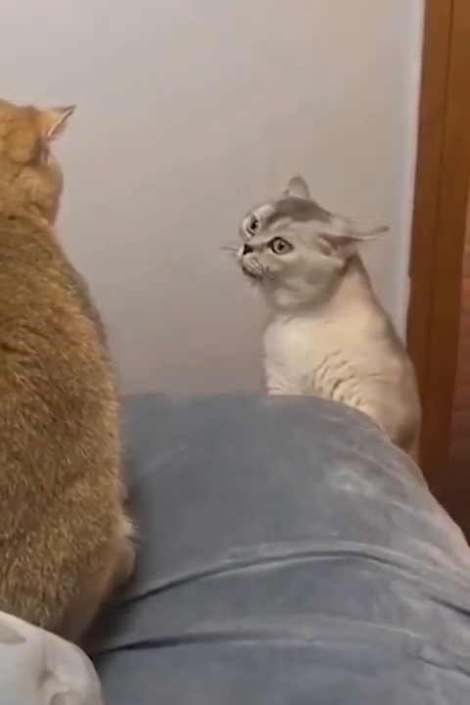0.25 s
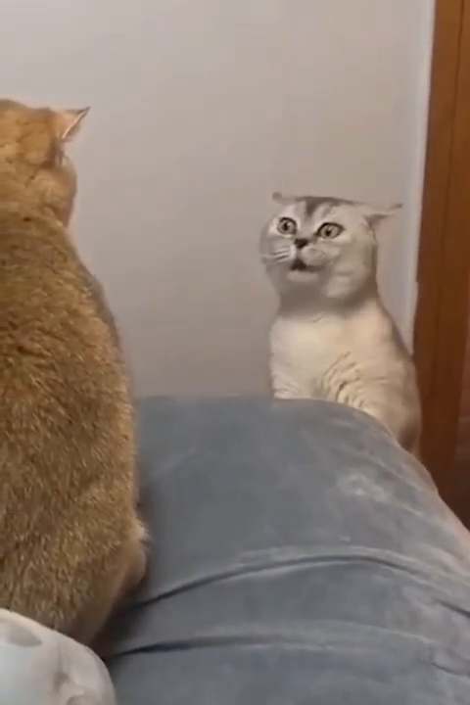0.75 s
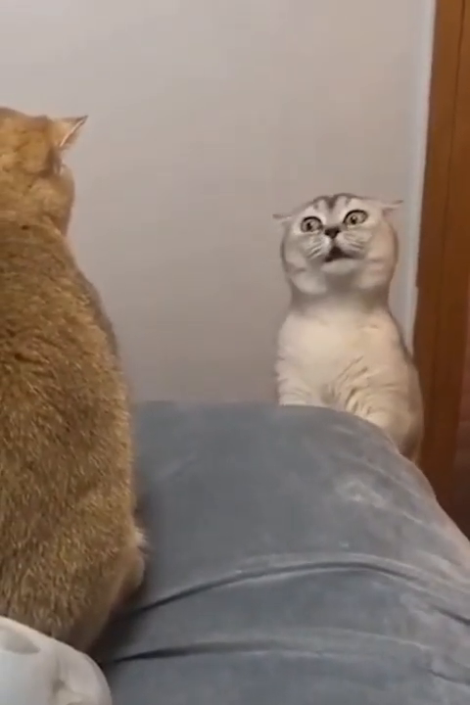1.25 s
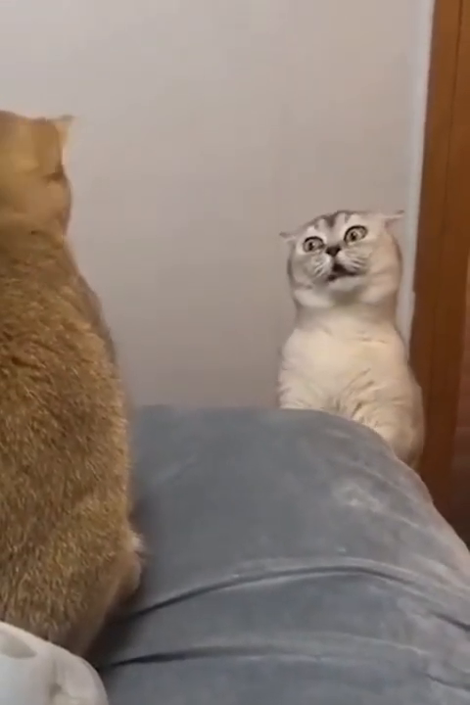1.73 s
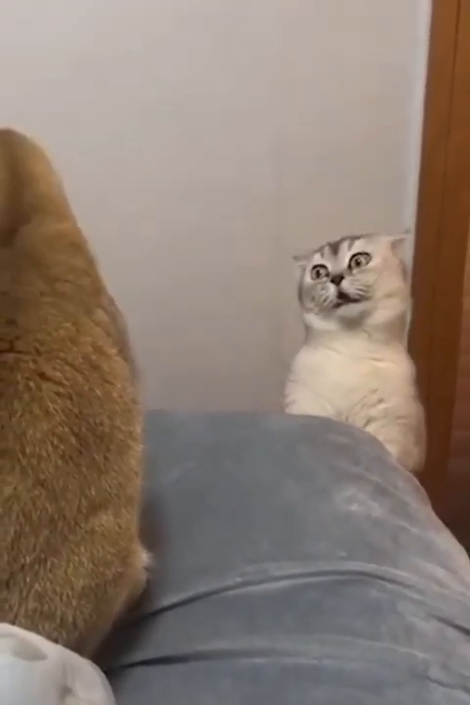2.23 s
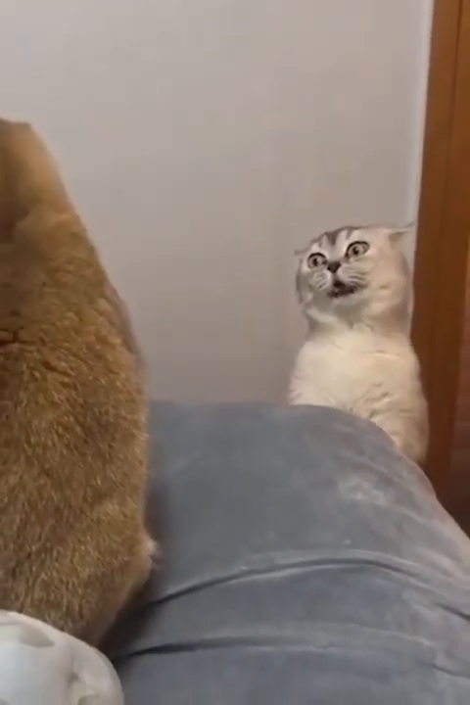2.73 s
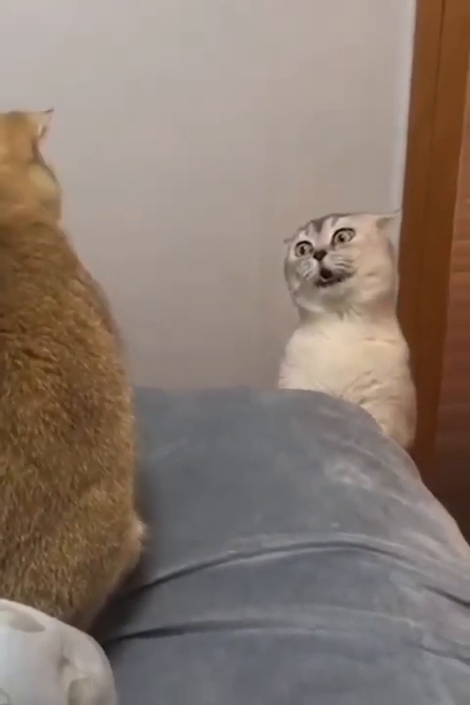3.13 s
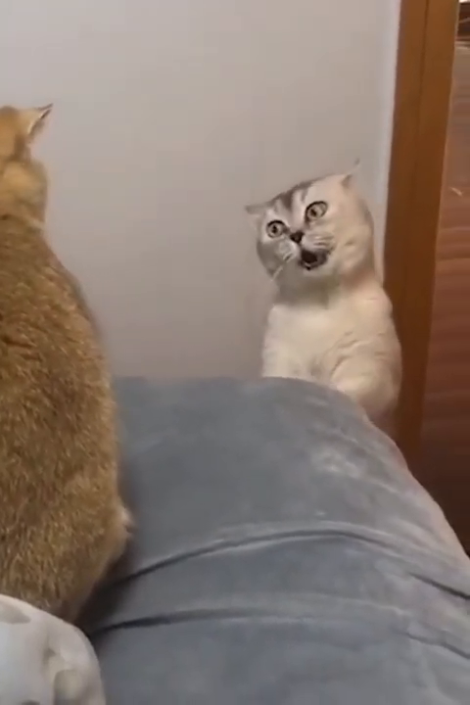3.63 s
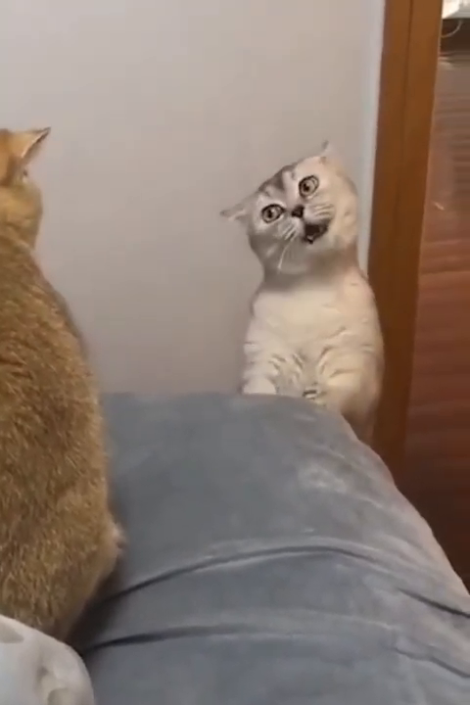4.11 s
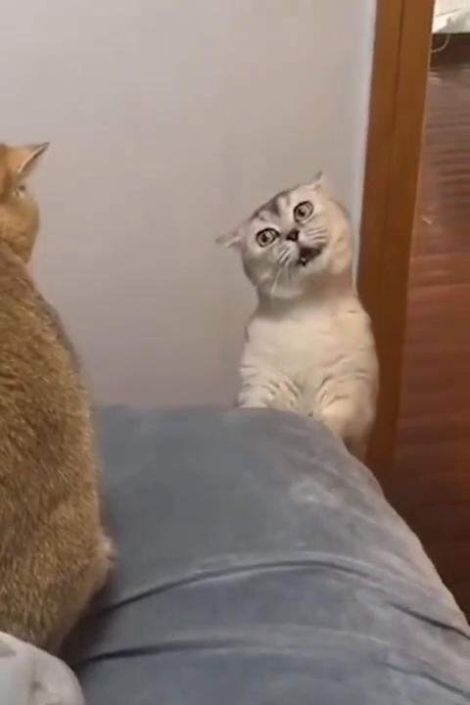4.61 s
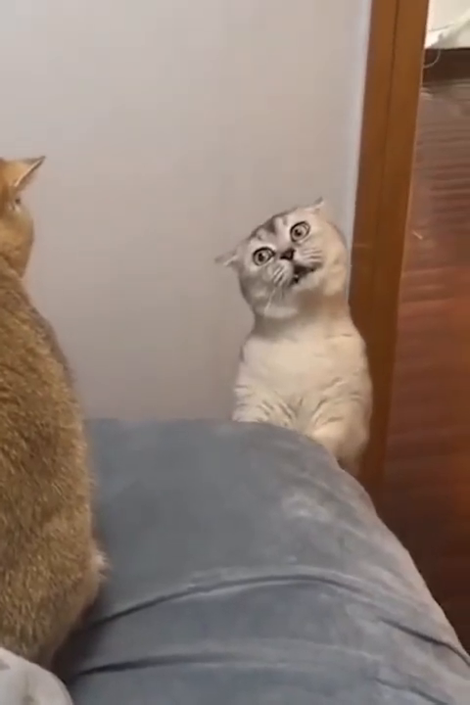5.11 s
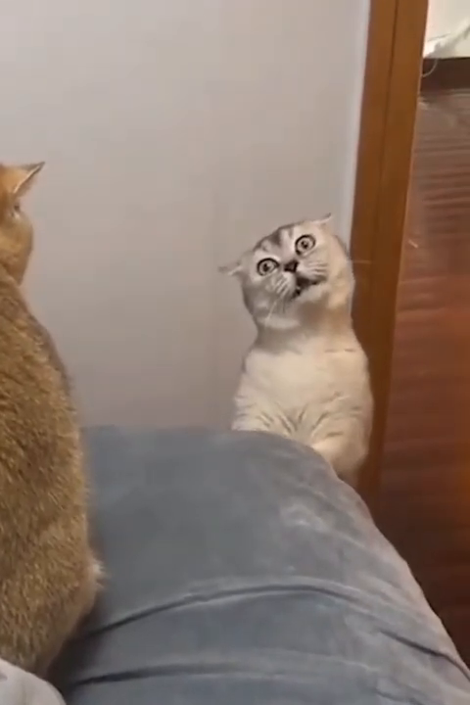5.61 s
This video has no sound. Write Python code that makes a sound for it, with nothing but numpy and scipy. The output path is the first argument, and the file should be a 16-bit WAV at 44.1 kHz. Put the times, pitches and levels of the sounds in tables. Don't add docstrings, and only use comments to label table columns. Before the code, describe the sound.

A cat gives two drawn-out nasal yowls in a small furnished room, with soft bedding thumps and cloth rustle close to the microphone.

```python
import sys
import numpy as np
from scipy import signal
from scipy.io import wavfile
from scipy.ndimage import uniform_filter1d, minimum_filter1d

SR = 44100
rng = np.random.default_rng(int(sys.argv[2]) if len(sys.argv) > 2 else 0)


def nominal_scale(level):
    x = np.asarray(level, float) / 20
    return 10 ** x


def digitize_waveform(pressure):
    field = np.atleast_2d(pressure).T
    bounded = np.clip(field, -1, 1)
    quanta = np.round(bounded * 32767).astype(np.int16)
    wavfile.write(sys.argv[1], SR, quanta)


N = 258426
STEP = 64

# t/s, f/Hz
PITCH = [
    [(0.0, 321.2), (.06, 319.1), (.15, 309.3), (.29, 311.9), (.45, 324.2), (.52, 323.2), (.75, 331.6),
     (.98, 337), (1.03, 345), (1.09, 333)],
    [(2.3, 372.6), (2.34, 355.7), (2.38, 357.7), (2.446, 375), (2.48, 377), (2.54, 399), (2.62, 417),
     (2.746, 413), (2.88, 397.5), (3.0, 385), (3.1, 366.5), (3.3, 373.1), (3.56, 377.9), (3.7, 380.5),
     (3.98, 356.1), (4.32, 354.9), (4.75, 358.3), (5.1, 354), (5.145, 352), (5.17, 357.7), (5.2, 359),
     (5.245, 367), (5.31, 368)],
]
# t/s, level/dB, throat resonance f/Hz, upper overtones share/dB, nose share/dB
EFFORT = [
    [(0.0, -30.5, 1010, -13.5, -29), (.13, -29, 1105, -16, -16), (.27, -28.5, 1128, -17.5, -14),
     (.4, -26.5, 930, -18, -23), (.53, -22.5, 943, -23, -18.5), (.74, -26.5, 924, -15.5, -19),
     (.8, -25, 939, -19, -23), (.97, -33, 981, -12, -14.5), (1.025, -30, 950, -17, -29),
     (1.065, -33, 951, -20, -20.5)],
    [(2.32, -33, 1176, -8, -6.5), (2.44, -26.5, 1100, -15, -15), (2.54, -30, 1200, -12, -4),
     (2.62, -40, 1360, -2.5, -2.5), (2.83, -34, 1355, -4, -2), (2.93, -25.5, 1110, -13.5, -14),
     (3.05, -25, 1080, -17, -15), (3.15, -26.5, 1230, -6, -3.5), (3.25, -23, 1344, -12, -12.5),
     (3.42, -19, 1430, -8, -22.5), (3.62, -16.5, 1580, -9, -25), (3.85, -13.5, 1510, -12.5, -21),
     (3.97, -27, 1214, -6.5, -9), (4.15, -30.5, 1200, -7, -6), (4.4, -31.5, 1255, -7.5, -3.5),
     (4.57, -31, 1080, -9, -4.5), (5, -33.5, 1040, -7, -5.5), (5.11, -41, 1050, -3, 2),
     (5.21, -38, 1060, -15, -5.5)],
]
ATTACK_DB_PER_S = [
    [300, 560],
]
RELEASE_DB_PER_S = [
    [1000, 310],
]
# t/s, width/s, change/dB
ECHO_BEATS = [(.12, .012, -8), (.322, .008, -5), (.735, .015, 2), (.83, .012, -2), (.9, .02, -2),
              (.77, .012, -3), (1.052, .006, -6), (2.36, .012, -8), (2.49, .015, 3), (2.523, .006, -22),
              (2.537, .005, 4), (2.552, .006, -6), (2.58, .006, -6), (2.885, .012, 6), (2.903, .005, -12),
              (2.918, .006, 3), (2.94, .01, -9), (2.97, .01, 4), (2.988, .005, -10), (3.62, .015, 1.5),
              (3.755, .016, 3), (3.71, .03, -1.5), (3.802, .012, -8), (3.84, .01, 0), (3.885, .007, -2),
              (2.421, .005, -3), (2.434, .007, 3), (3.915, .006, -4), (5.12, .008, -4), (5.165, .008, -4)]
# t/s, level/dB
CHEST = [(0, -54.5), (.3, -51.5), (1.02, -54), (1.06, -53.5), (1.085, -79), (2.3, -55.5), (2.47, -54.5),
         (2.55, -47.5), (2.85, -44), (2.96, -49), (3.05, -46.5), (3.3, -45), (3.65, -44), (3.85, -45.5),
         (4.05, -48), (4.8, -51.5), (5.18, -53.5), (5.24, -47), (5.3, -78)]
# t/s, mouth f/Hz, upper resonance f/Hz, its level/dB, treble re upper overtones/dB
MOUTH = [(0, 2270, 4300, -14, -26), (.25, 2140, 4120, -12, -21.5), (.5, 2350, 4070, -6, -21),
         (.74, 2200, 4300, -27, -24), (1.0, 2070, 4320, -15, -25.5), (2.3, 1760, 4280, -28, -33),
         (2.4, 1900, 4334, -16, -24), (2.47, 2370, 4295, -29, -19), (2.6, 2350, 4600, -20, -24),
         (2.75, 2380, 4640, -24, -18), (2.9, 2530, 4530, -13, -17), (3.03, 2510, 4615, -8, -13),
         (3.15, 2384, 4700, -14, -18), (3.25, 2700, 4850, 0, -13), (3.45, 2640, 5060, -11, -17),
         (3.6, 2860, 4820, -13, -17.5), (3.75, 2810, 4900, -15.5, -17), (3.85, 2930, 5010, -11, -16),
         (4.04, 2717, 4660, -4.5, -8.5), (4.29, 2190, 4490, -5, -11), (4.45, 2080, 4600, -8.5, -9),
         (4.7, 1940, 4460, -7, -9), (4.95, 1940, 4690, -4, -11), (5.1, 2035, 4480, -0.5, -14),
         (5.2, 2000, 4340, 14, -16.5), (5.3, 2010, 4460, 13, -28)]
# t/s, breath re upper overtones/dB
HOARSE = [(0, -22), (.3, -24), (.95, -21), (1.06, -9), (2.3, -19), (2.45, -20), (2.95, -18), (3.15, -25),
          (3.85, -24), (4.1, -15.5), (4.5, -15), (5.08, -13), (5.24, -9)]
# t/s, f/Hz, change/dB
NASAL_POCKET = [(0, 5420, -13.5), (.4, 5330, -9), (.41, 1340, 5.5), (.55, 1350, -9.5), (.65, 1310, -22),
                (.75, 1320, -16), (.9, 1345, -20), (1.05, 1370, -6), (2.3, 2600, -37), (2.5, 2760, -25),
                (2.7, 3640, -18), (3.1, 2950, -17), (3.4, 3310, -20), (3.72, 3540, -6.5), (3.84, 3410, -23),
                (3.97, 3234, -17), (4.08, 3200, 7), (4.12, 3400, 10.5), (4.6, 3600, 6), (4.65, 3000, 15),
                (4.9, 2900, 10), (5.15, 2970, 20.5)]
# t/s, f/Hz, change/dB
PALATE_POCKET = [(0, 3540, -4), (.25, 3570, -10), (.55, 3570, -12.5), (.65, 3290, -5), (.95, 3370, -9.5),
                 (1.06, 3400, -9), (2.3, 1950, 7), (2.52, 1960, -8), (2.62, 2050, 1), (2.95, 1580, -7.5),
                 (3.0, 1520, -12), (3.1, 1740, -14), (3.25, 1870, -6), (3.599, 1853, -4), (3.841, 1850, -7),
                 (3.96, 1764, -4.5), (4.15, 1780, -4.5), (4.32, 1800, -8), (4.5, 1780, -3.5),
                 (4.7, 1500, -5), (4.92, 1420, -6), (5.16, 1420, -1)]
# t/s, f/Hz, change/dB
SINUS_POCKET = [(0, 5800, -4), (0.449, 5650, -11), (.6, 5740, -2.5), (.75, 5150, -10), (.87, 5370, -14),
                (1.0, 5300, -4), (2.3, 5315, -9), (2.52, 6610, -3), (2.7, 6500, 10), (2.88, 6110, -20),
                (3.0, 6000, -16), (3.12, 5225, 1), (3.3, 5300, -8), (3.5, 6200, -4), (3.749, 5960, -3.5),
                (4.0, 5280, -8.5), (4.2, 5690, 8), (4.45, 5570, 9), (4.6, 5330, 10), (4.75, 6270, 12),
                (5.04, 5960, 13.5), (5.16, 6020, 14)]
# t/s, low-overtone depth [0-1], upper-overtone depth [0-1]
FLUTTER = [(0, .08, .4), (.15, .06, .33), (.95, .05, .25), (1.06, .3, .6), (2.3, .15, .55), (2.55, .15, .5),
           (2.62, .4, .35), (2.82, .35, .3), (2.87, .1, .35), (3.05, .06, .3), (3.2, .03, .12),
           (3.7, .03, .12), (3.9, .05, .35), (3.96, .15, .3), (4.1, .05, .24), (5.05, .05, .27),
           (5.2, .2, .4)]
# f/Hz, level/dB
TREBLE_SHAPE = [(6500, 7), (7050, -8), (7500, -12.5), (8300, -7.5), (9530, -13), (10500, -11.5),
                (12700, -15.5), (14600, -19.5)]
# shift/Hz, from f/Hz, to f/Hz
SHIFTS = [
    (SR / 8, 6540, 12060),
    (SR * 7 / 32, 12060, 14500),
]
# t/s, width/s, level/dB
PUSHES = [(.16, 0.014, -60), (.29, 0.031, -40), (.49, 0.017, -51), (.77, 0.041, -59), (.885, 0.028, -38),
          (1.2, 0.018, -47.5), (1.33, 0.043, -51), (1.455, 0.029, -47.5), (1.99, 0.021, -63),
          (2.13, 0.037, -49), (2.29, 0.062, -54), (2.4, 0.014, -44), (2.72, 0.028, -48.5),
          (2.96, 0.044, -48), (3.3, 0.18, -58), (3.78, 0.097, -58), (4.04, 0.059, -54), (4.49, 0.061, -54),
          (4.87, 0.1, -56.5), (5.23, 0.033, -49), (5.43, 0.064, -55.5), (5.705, 0.026, -46),
          (5.8, 0.079, -64)]
# t/s, width/s, level/dB
JOLTS = [(.11, 0.033, -60), (.28, 0.019, -63), (0.869, 0.035, -65), (1.5, 0.042, -59), (2.12, 0.044, -60),
         (2.758, 0.029, -54), (3.171, 0.043, -65), (3.77, 0.046, -52), (4.03, 0.035, -62),
         (4.87, 0.046, -48), (5.74, 0.063, -52)]
# t/s, width/s, low level/dB, high level/dB
RUSTLES = [(1.2, .014, -55, -62), (1.3, .04, -66, -67), (1.46, .05, -60, -64.5), (1.92, .12, -72, -69),
           (2.17, .015, -58, -70), (2.28, .03, -57, -64), (4.875, .02, -57, -58), (5.26, .03, -62, -64),
           (5.415, .025, -62, -60), (5.54, .03, -63, -63.5), (5.705, .03, -57, -63.5)]
# f/Hz, density level/dB per Hz
RUSTLE_SHAPE = [(270, -29.5), (430, 1.5), (510, -13), (840, -1.5), (1510, -7.5), (4390, -20.5),
                (12800, -29), (14600, -38)]
# t/s, peak level/dB, ring f/Hz, t60/s, width/octaves
TICKS = [
    (0.964, -40.5, 5100, 0.035, .15),
    (1.18, -37.5, 1480, 0.027, 1.6),
    (1.2, -45, 1136, 0.036, .8),
    (4.88, -51, 12100, 0.021, .75),
    (2.152, -44, 1100, .04, 1.2),
    (4.884, -47, 15240, .04, 0.063),
    (2.715, -49, 1950, .04, 0.53),
    (5.245, -47.5, 4440, 0.045, 0.18),
    (5.7, -43, 870, 0.035, .7),
]
# t/s, peak level/dB, f/Hz, t60/s
KNOCKS = [
    (1.193, -47, 172, .1),
    (1.289, -33.5, 160, .11),
    (1.33, -46, 190, .1),
    (1.41, -39, 201, 0.06),
    (1.43, -44, 190, 0.038),
    (1.447, -36, 162, 0.086),
    (1.469, -37, 173, 0.079),
]
# t/s, length/s, level/dB, f/Hz, width/Hz
CREAKS = [
    (1.255, 0.14, -59, 1580, 350),
    (2.149, 0.1, -59, 1510, 300),
    (2.15, 0.07, -56, 960, 120),
    (2.19, .05, -54, 1200, 300),
    (2.25, .045, -52, 1020, 90),
    (2.155, 0.07, -51, 490, 70),
    (2.24, .06, -55, 680, 80),
    (5.2, .09, -66, 1100, 120),
]
# from t/s, to t/s, from f/Hz, to f/Hz
EMPTY = [(0, .24, 4700, 5900), (.33, .36, 5000, 5900), (.74, .9, 5250, 5750), (2.16, 2.25, 7500, 8700),
         (2.3, 2.62, 7000, 8600), (2.45, 2.5, 2600, 3000), (2.86, 2.91, 5800, 6400),
         (3.0, 3.08, 5900, 6300), (3.82, 3.88, 3250, 3500)]

MOUTH_WIDTH_HZ, UPPER_WIDTH_HZ = 373, 400
TOP_HZ, TOP_WIDTH_HZ, TOP_DB = 6376, 530, -19
SIDE_HZ, SIDE_WIDTH_HZ, SIDE_DB = 1750, 300, -13
THROAT_Q, THROAT_STEEPNESS, SOURCE_DB_PER_ORDER, ABOVE_DB_PER_OCTAVE = 6.5, 0.88, 3.5, -25.5
THROAT_HISS_DB = -15.5
POCKET_WIDTH_HZ, FLUTTER_PER_S = 430, 30
PUSH_FLOOR_DB, JOLT_FLOOR_DB, LOW_FLOOR_DB, HIGH_FLOOR_DB = -67, -65, -70, -72.5
TAIL_STRETCH = 1.4
ROOM_T60_S, ROOM_DB = 0.26, -19
STARVED_DB, STARVED_SPREAD_DB, HOLE_DB = -21, 8.0, -30
EMPTY_DB, CUTOFF_HZ = -11.5, 14550


def cat(jitter=0.0011):
    pitch_hz = uniform_filter1d(joined(PITCH)[0], size=25)
    upper_share_db = joined(EFFORT)[2]
    hoarse_db = joined([HOARSE])[0]
    level_db = breath_level()
    s, width_s, change_db = np.transpose(ECHO_BEATS)
    echo_beat_db = change_db @ bell(s, width_s)
    upper_level_db = level_db + upper_share_db + 0.084 * echo_beat_db

    shaky_hz = pitch_hz * (1 + jitter * (1 + 6 * nominal_scale(hoarse_db)) * drift(31))
    phase = 2 * np.pi * np.cumsum(full(shaky_hz)) / SR
    voice = low_overtones(pitch_hz, phase, level_db, echo_beat_db)
    voice += upper_overtones(pitch_hz, phase, upper_level_db, hoarse_db)
    voice += breath(phase, level_db, upper_level_db, hoarse_db)
    return voice, shifted_treble(pitch_hz, phase, upper_level_db)


def breath_level():
    t = np.arange(N // STEP + 2) * STEP / SR
    each = []
    for call, rise, fall in zip(EFFORT, ATTACK_DB_PER_S[0], RELEASE_DB_PER_S[0]):
        held_db = np.interp(t, *np.transpose(call)[:2])
        before_s = (call[0][0] - t).clip(0)
        after_s = (t - call[-1][0]).clip(0)
        each.append(held_db - rise * before_s - fall * after_s ** 1.75 * 3)
    return np.max(each, axis=0)


def low_overtones(pitch_hz, phase, level_db, echo_beat_db, wander_db=0.5):
    throat_hz, _, nose_db = joined(EFFORT)[1:]
    orders = np.arange(3, 5)[:, None]
    ratio = orders * pitch_hz / throat_hz
    resonance = ((1 - ratio ** 2) ** 2 + (ratio / THROAT_Q) ** 2) ** (-THROAT_STEEPNESS / 2)
    tilt_db = SOURCE_DB_PER_ORDER * orders + ABOVE_DB_PER_OCTAVE * np.log2(ratio).clip(0)
    throat = resonance * nominal_scale(tilt_db) * pockets(ratio * throat_hz)
    nose = nominal_scale(level_db + nose_db + .5 * echo_beat_db)
    gains = np.vstack([nose, evened(throat, level_db + echo_beat_db)])
    gains = gains * nominal_scale(wander_db * np.array([drift(6.0) for k in range(3)]))
    chest = nominal_scale(np.minimum(joined([CHEST])[0], level_db + 21))
    low_depth = joined([FLUTTER])[0]
    return overtones(range(1, 5), np.vstack([chest, gains * flutter(low_depth, count=3)]), phase)


def upper_overtones(pitch_hz, phase, level_db, hoarse_db):
    mouth_hz, upper_hz, upper_db, _ = joined([MOUTH])
    orders = np.arange(5, 21)
    hz = orders[:, None] * pitch_hz
    tract = hump(hz, mouth_hz, MOUTH_WIDTH_HZ)
    tract = tract + nominal_scale(upper_db) * hump(hz, upper_hz, UPPER_WIDTH_HZ)
    tract = tract + nominal_scale(TOP_DB) * hump(hz, TOP_HZ, TOP_WIDTH_HZ)
    tract = tract + nominal_scale(SIDE_DB) * hump(hz, SIDE_HZ, SIDE_WIDTH_HZ)
    tract = tract * pockets(hz)
    fast_share = .8 + 3 * nominal_scale(hoarse_db)
    wander = nominal_scale(1.7 * np.array([.7 * drift(3.94) + fast_share * drift(14) for k in orders]))
    gains = evened(tract * wander * (hz < SHIFTS[0][1]), level_db)
    high_depth = joined([FLUTTER])[1]
    return overtones(orders, gains * flutter(high_depth, count=16), phase)


def breath(phase, level_db, upper_level_db, hoarse_db):
    mouth = .65 * band(2000, 3200) + .55 * band(4100, 4900) + .35 * band(5600, 6500)
    out = nominal_scale(full(upper_level_db + hoarse_db)) * (1 + .9 * np.sin(phase)) * mouth
    out += nominal_scale(full(level_db - 34)) * band(1200, 1900)
    throat_db = level_db.clip(-90, -27) + hoarse_db + THROAT_HISS_DB + 4 * drift(8)
    return out + nominal_scale(full(throat_db)) * band(420, 950)


def shifted_treble(pitch_hz, phase, upper_level_db):
    treble_db = upper_level_db + joined([MOUTH])[3]
    treble = nominal_scale(full(treble_db - 16)) * band(6700, 14500, order=4)
    orders = np.arange(2, 22)
    gains = []
    for shift_hz, low_hz, high_hz in SHIFTS:
        hz = orders[:, None] * pitch_hz + shift_hz
        gains.append(nominal_scale(at_hz(TREBLE_SHAPE, hz)) * (hz > low_hz) * (hz < high_hz))
    gains = np.concatenate(gains)
    gains = evened(gains * nominal_scale(3.5 * np.array([drift(4.6) for g in gains])), treble_db)
    for (shift_hz, _, _), part in zip(SHIFTS, np.split(gains, len(SHIFTS))):
        used = part.any(axis=1)
        treble = treble + overtones(orders[used], part[used], phase, shift_hz)
    return treble


def overtones(orders, gains, phase, shift_hz=0):
    carrier = 2 * np.pi * shift_hz * np.arange(N) / SR
    out = np.zeros(N)
    for k, gain in zip(orders, gains):
        out += np.sqrt(2) * full(gain) * np.sin(k * phase + carrier + rng.uniform(0, 2 * np.pi))
    return out


def evened(gains, level_db):
    return gains / np.sqrt(np.sum(gains ** 2, axis=0) + 1e-20) * nominal_scale(level_db)


def hump(hz, centre_hz, width_hz):
    return (1 + (2 * (hz - centre_hz) / width_hz) ** 2) ** -.7


def pockets(hz):
    total_db = 0
    for pocket in (NASAL_POCKET, PALATE_POCKET, SINUS_POCKET):
        centre_hz, db = joined([pocket])
        total_db = total_db + db / (1 + (2 * (hz - centre_hz) / POCKET_WIDTH_HZ) ** 4)
    return nominal_scale(total_db)


def flutter(depth, count):
    beats = np.array([drift(FLUTTER_PER_S) for k in range(count)])
    return (1 + depth * beats) / np.sqrt(1 + depth ** 2)


def room(x):
    t = np.arange(int(.5 * SR)) / SR
    noise = rng.standard_normal(len(t))
    dull = signal.lfilter([.3], [1, -.7], noise)
    echo = dull * nominal_scale(-60 * t / ROOM_T60_S) + .5 * noise * nominal_scale(-60 * t / (0.029 * ROOM_T60_S))
    echo = echo * (t > .004)
    return signal.fftconvolve(x, echo / np.sqrt(np.sum(echo ** 2)))[:N]


def contacts():
    out, t = np.zeros(N), np.arange(N) / SR
    for s, db, hz, t60_s, octaves in TICKS:
        age = (t - s).clip(0)
        half = 2 ** (octaves / 2)
        out += (t >= s) * nominal_scale(db - 60 * age / t60_s) * band(hz / half, hz * half) / 2
    for s, db, hz, t60_s in KNOCKS:
        age = (t - s).clip(0)
        rise = 1 - np.exp(-age / 0.0056)
        out += nominal_scale(db - 60 * age / t60_s) * rise * 2 * np.sin(2 * np.pi * hz * age)
    for s, length_s, db, hz, width_hz in CREAKS:
        swell = np.abs(np.sin(np.pi * ((t - s) / length_s).clip(0, 1) ** 0.5) ** 0.4)
        rough = nominal_scale(db + 2.8 * full(drift(60)))
        out += rough * swell * band(hz - width_hz / 2, hz + width_hz / 2)
    return out


def bedding(lumpy_db=2.2, under_db=-16, restless_db=3.0, duck_db=-4):
    thump_db = swells(*np.transpose(PUSHES), PUSH_FLOOR_DB + restless_db * drift(5.4))
    rumble_db = swells(*np.transpose(JOLTS), JOLT_FLOOR_DB + restless_db * drift(2.4))
    out = nominal_scale(full(thump_db)) * unit(band(100, 241.0) * nominal_scale(lumpy_db * full(drift(40))))
    out += nominal_scale(full(rumble_db)) * band(3.3, 72)

    s, width_s, low_db, high_db = np.transpose(RUSTLES)
    duck = duck_db * ((breath_level() + 35) / 15).clip(0, 1)
    cloth_db = swells(s, width_s, low_db, LOW_FLOOR_DB + duck)
    low_db = 10 * np.log10(nominal_scale(cloth_db) ** 2 + nominal_scale(thump_db + under_db) ** 2)
    high_db = swells(s, width_s, high_db, HIGH_FLOOR_DB + duck)
    edges_hz = 270 * 2 ** np.arange(0, 5.8, 1 / 2)
    for level_db, part in ((low_db, edges_hz[:7]), (high_db, edges_hz[6:])):
        rustle = np.zeros(N)
        for a, b in zip(part, part[1:]):
            density_db = at_hz(RUSTLE_SHAPE, np.sqrt(a * b)) + 1.5 * full(drift(28))
            rustle += nominal_scale(density_db) * np.sqrt(b - a) * band(a, b)
        out += nominal_scale(full(level_db)) * unit(rustle)
    return out


def swells(s, width_s, db, floor_db):
    power = np.sum((nominal_scale(db)[:, None] * bell(s, width_s, TAIL_STRETCH)) ** 2, axis=0)
    return 10 * np.log10(nominal_scale(floor_db) ** 2 + power)


def thinned(x):
    hz, s, z = signal.stft(x, SR, "hann", nperseg=1024, noverlap=768)
    near = -minimum_filter1d(-np.abs(z), size=11, axis=0)
    luck = rng.standard_normal((len(hz) // 4 + 1, len(s)))
    luck = uniform_filter1d(luck, size=30, axis=1) * np.sqrt(30)
    luck = np.repeat(luck, 4, axis=0)[:len(hz)]
    margin_db = 20 * np.log10(np.abs(z) / near + 1e-9) - STARVED_DB - STARVED_SPREAD_DB * luck
    hole_db = HOLE_DB / (1 + np.exp(margin_db.clip(-40, 40) / 2))
    keep = nominal_scale(hole_db * (hz[:, None] / 1500).clip(0, 1))
    for start_s, end_s, low_hz, high_hz in EMPTY:
        in_band = (hz[:, None] > low_hz) & (hz[:, None] < high_hz)
        keep = keep * np.where(in_band & (s > start_s) & (s < end_s), nominal_scale(EMPTY_DB), 1)
    y = signal.istft(z * keep, SR, "hann", nperseg=1024, noverlap=768)[1][:N]
    return signal.sosfilt(signal.cheby2(14, 60, CUTOFF_HZ + 150, fs=SR, output="sos"), y)


def unit(x):
    return x / np.sqrt(np.mean(x ** 2) + 1e-20)


def band(low_hz, high_hz, order=2):
    sos = signal.butter(order, [low_hz, high_hz], "band", fs=SR, output="sos")
    return unit(signal.sosfilt(sos, rng.standard_normal(N)))


def drift(rate_hz):
    r = np.exp(-2 * np.pi * STEP * rate_hz / SR)
    noise = rng.standard_normal(N // STEP + 502)
    return unit(signal.lfilter([1], [1, -2 * r, r * r], noise)[500:])


def bell(s, width_s, stretch=1):
    away = (np.arange(N // STEP + 2) * STEP / SR - s[:, None]) / width_s[:, None]
    return np.exp(-.5 * np.where(away > 0, away / stretch, away) ** 2)


def joined(calls):
    s, *columns = np.transpose(np.concatenate(calls))
    t = np.arange(N // STEP + 2) * STEP / SR
    return np.array([np.interp(t, s, c) for c in columns])


def full(slow):
    return np.interp(np.arange(N) / STEP, np.arange(len(slow)), slow)


def at_hz(points, hz):
    points_hz, db = np.transpose(points)
    return np.interp(np.log(hz), np.log(points_hz), db)


def scene():
    voice, treble = cat()
    mix = voice + nominal_scale(ROOM_DB) * room(voice) + treble + bedding()
    return (thinned(mix) + contacts())[None]


def top_cut(x):
    return signal.sosfilt(signal.butter(12, 15630, fs=SR, output="sos"), x)


def record(dry):
    return top_cut(dry)


dry = scene()
out = record(dry)
digitize_waveform(out)
```